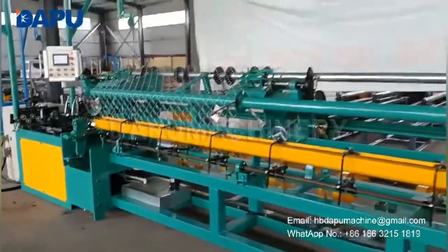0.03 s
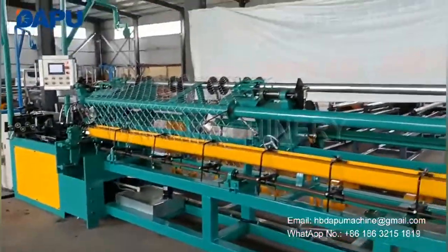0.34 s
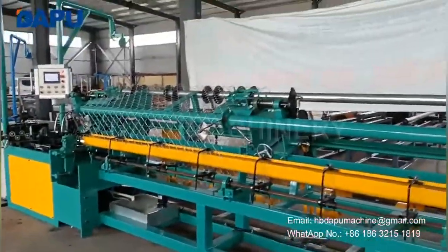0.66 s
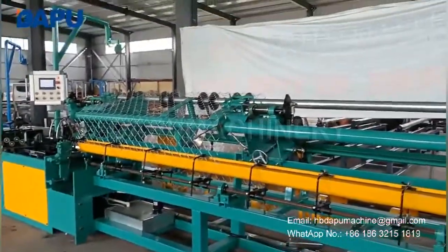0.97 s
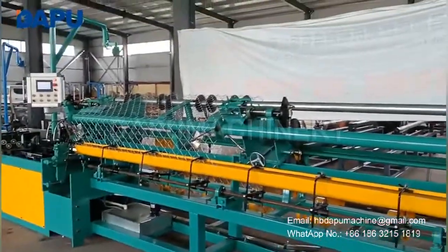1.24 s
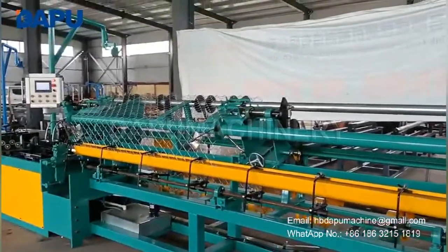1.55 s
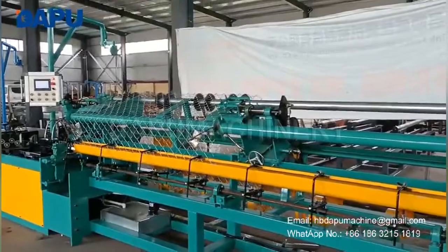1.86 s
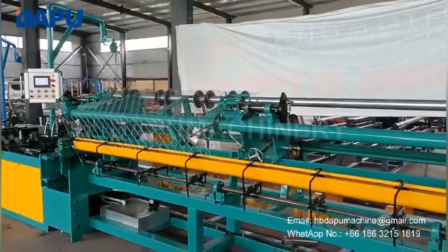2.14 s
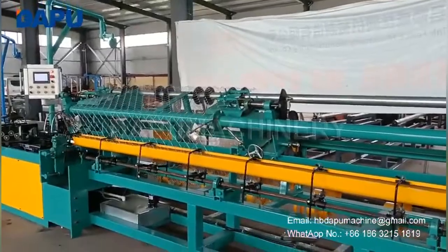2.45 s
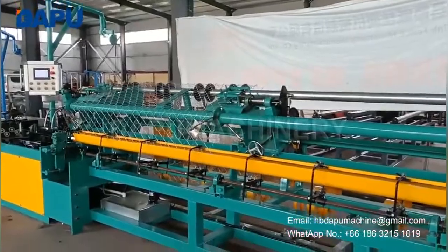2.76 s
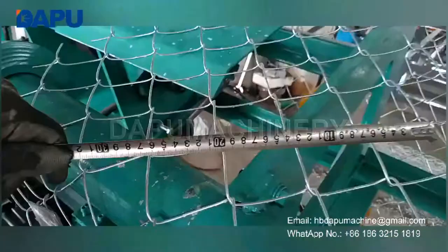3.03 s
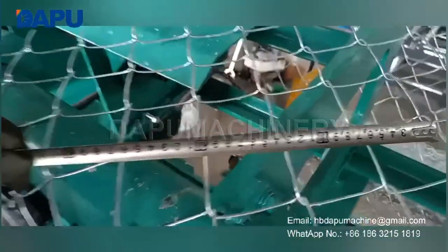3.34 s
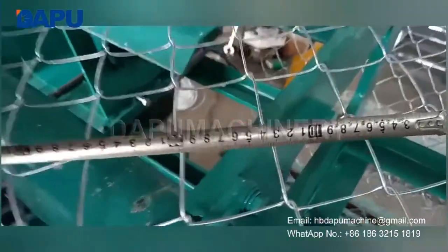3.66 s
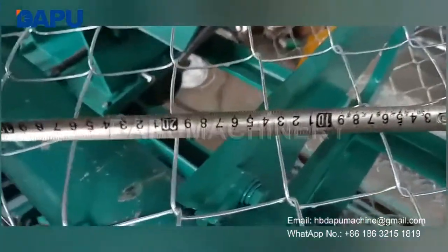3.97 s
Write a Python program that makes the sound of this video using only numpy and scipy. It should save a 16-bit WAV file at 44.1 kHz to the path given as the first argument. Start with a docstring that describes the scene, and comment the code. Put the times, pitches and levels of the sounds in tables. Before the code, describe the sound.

Rapid metallic clatter of a fence weaving machine, a heavy thump, then soft idling hum.

```python
"""Wire rattles, scrapes once a turn and slaps its guide as the spinning blade of a chain-link
weaving machine winds it into the mesh, over a drone in a factory hall. The blade runs down, a clamp
closes, the carriage thumps and hauls the rumbling mesh on, and a lever clacks.
After a short silence the machine idles close by: motor hum and pump whine."""
import sys
import numpy as np
from scipy import signal
from scipy.fft import rfft, irfft, next_fast_len
from scipy.io import wavfile
from scipy.ndimage import uniform_filter1d, map_coordinates

SR = 44100
rng = np.random.default_rng(int(sys.argv[2]) if len(sys.argv) > 2 else 0)


def generate_wav(sig):
    """Save sig (samples, or channels by samples) to the path in sys.argv[1] as 16-bit PCM at SR."""
    pcm = np.round(np.clip(np.atleast_2d(sig).T, -1, 1) * 32767).astype(np.int16)
    wavfile.write(sys.argv[1], SR, pcm)


N = 176400

# blade effort: t/s, rattle level/dB
BLADE_EFFORT = [(0, -23), (.33, -26.5), (.42, -24), (.8, -22), (1.2, -22.5), (1.36, -25), (1.5, -33),
                (1.7, -43.5), (1.9, -51)]
# rattle spectrum: f/Hz, level/dB
RATTLE_SPECTRUM = [(410, -44), (700, -13), (1060, -9), (1300, -12.5), (1710, -4), (1870, -8.5), (2130, -3),
                   (2840, -5.5), (3360, -3), (5290, -7), (7400, 0), (11400, -18.5), (15500, -13)]

def wire_rattle():
    """Spinning wire chatters in dense contacts that fade as the blade runs down."""
    effort_db, = curves(BLADE_EFFORT)
    gain = amp(effort_db + 0.3 * wobble(69.2))
    return gain * spread(taps(per_s=2000, scatter_db=1.5), twang(RATTLE_SPECTRUM))

# scrape of each turn: level/dB
TURN_DB = [-21, -19.5, -18, -18, -17, -16.5, -16.5, -36.5]
# scrape spectrum: f/Hz, level/dB
SCRAPE_SPECTRUM = [(500, -24), (1500, -7), (3400, -2), (5000, -4.5), (7800, -3.5), (10000, -11),
                   (12500, -15.5), (15500, -9)]

def blade_scrape(turn_s=.1935, first_s=.001, fade_s=.027):
    """The blade scrapes the wire once a turn."""
    t = clock() - first_s
    turns = sum(amp(db) * np.exp(-np.abs(t - k * turn_s) / fade_s) for k, db in enumerate(TURN_DB))
    return turns * spread(taps(per_s=6000, scatter_db=1.0), colour(SCRAPE_SPECTRUM))

# wire on guide: t/s, hold/s, level/dB, extra knock/dB
GUIDE_SLAPS = [(0.077, 0.022, -21.5, 5), (0.258, 0.038, -24, 7), (0.368, 0.021, -21, 3),
               (0.438, 0.024, -17.5, 4), (0.568, 0.0099, -22.5, 0.5), (0.627, 0.017, -16.5, 6.5),
               (0.738, 0.0085, -23, -4), (0.772, 0.007, -16, -5.5), (0.823, 0.02, -19, 4),
               (0.97, 0.0062, -30, 2.5), (1.024, 0.0044, -17.5, 7), (1.223, 0.0051, -14, -0.5),
               (1.367, 0.0068, -20.5, -17.5)]
# slap spectrum: f/Hz, level/dB
SLAP_SPECTRUM = [(1000, -23.5), (2300, -4), (3300, 1.5), (4050, -1), (5400, -3.5), (7500, 1), (8500, -1),
                 (10500, -17.5), (15500, -23)]
# guide response: f/Hz, level/dB
KNOCK_SPECTRUM = [(150, -28), (480, -1), (700, -1.5), (1080, -3), (1500, -11), (3000, -18)]

def guide_slaps(knock_db=-15.5, lag_s=.0068):
    """The wire slaps its guide, which answers with a duller knock; returns both."""
    force = sum(amp(db) * envelope(s, .002, hold, .035) for s, hold, db, _ in GUIDE_SLAPS)
    slaps = rms(force) * spread(force * taps(per_s=2000, scatter_db=4.5), twang(SLAP_SPECTRUM))
    recoil = sum(amp(db + knock_db + extra_db) * envelope(s + lag_s, .012, 0, .18)
                 for s, _, db, extra_db in GUIDE_SLAPS)
    return slaps, recoil * noise(colour(KNOCK_SPECTRUM))

# pings of the hardest slaps: t/s, relative level/dB
SLAP_PINGS = [(.388, -23.5), (.452, -21.5), (.645, -21.5), (.78, -25), (.829, -20.5), (1.0235, -12.5),
              (1.2285, -21.5)]
# ping modes: f/Hz, width/Hz, level/dB
PING_MODES = [(3900, 180, 4), (7400, 840, -0.5)]

def wire_pings():
    """The hardest slaps ping sharply; each runs down the wire as a falling chirp."""
    strikes = np.zeros((2, N))
    for s, db in SLAP_PINGS:
        strikes[:, round(s * SR)] = amp(db)
    chirp = lambda hz: body(PING_MODES)(hz) * dispersion(hz)
    peak = np.abs(irfft(chirp(np.fft.rfftfreq(SR, 1 / SR)))).max()
    return 2 * filtered(strikes, chirp) / peak

# blade and wire modes: f/Hz, width/Hz, level/dB
BLADE_MODES = [(1072, 45, -7.5), (1755, 19, -4.5), (2170, 73, -1.5), (3360, 100, 1.5), (4010, 65, 2),
               (5980, 56, -0.5), (6950, 68, -3.5), (7750, 68, 2.5)]

def weaving():
    """Wire contacts ring the blade and wire; clatter and pings carry into the hall."""
    contacts = wire_rattle() + blade_scrape()
    slaps, knock = guide_slaps()
    contacts += slaps
    ring = amp(-15) * ringing(contacts, BLADE_MODES, vary_db=2.5)
    knock_ring = ringing(knock, BLADE_MODES[:2], vary_db=2.5)
    clatter = hall(contacts + ring + knock + knock_ring, wet_db=-5.5)
    return rms(clatter) * patchy(clatter, depth_db=2) + hall(wire_pings(), wet_db=-9)

# mechanism blows: t/s, rise and hold each/s, t60/s, thud/dB, clang/dB, jangle/dB
CARRIAGE_BLOWS = [(1.529, 0.0122, 0.84, -36.5, -26.5, -54), (1.656, 0.018, 1, -41, -37.5, -46),
                  (1.918, 0.028, 0.68, -19.5, -29.5, -23.5), (2.12, 0.016, 1, -40, -40, -29),
                  (2.255, 0.031, 0.32, -46, -46.5, -28.5), (2.35, 0.015, 0.46, -26, -47, -38.5)]
# carriage thud spectrum: f/Hz, level/dB
THUD_SPECTRUM = [(70, -20), (185, 6.5), (270, -13.5), (450, -1), (750, -11.5), (950, -7), (1400, -11.5),
                 (2500, -45), (8000, -56.5)]
# deep bed mode: f/Hz, width/Hz, level/dB
BED_MODE = [(95.5, 79, 0)]
# frame modes: f/Hz, width/Hz, level/dB
FRAME_MODES = [(453, 70, -8.5), (549, 46, -4.5), (652, 23, -2.5), (1300, 49, -11.5)]
# mesh jangle spectrum: f/Hz, level/dB
JANGLE_SPECTRUM = [(500, -17), (1000, -7), (1800, -12), (3000, -6), (5000, -13.5), (7200, -8),
                   (11500, -23.5), (15500, -21.5)]

def clamp_and_carriage():
    """Each blow thuds, clangs the frame and jangles the mesh; only hard ones make the bed boom."""
    thud_gain, clang_gain, jangle_gain = sum(amp(levels)[:, None] * envelope(s, rise, rise, t60)
                                             for s, rise, t60, *levels in CARRIAGE_BLOWS)
    thud = thud_gain * noise(colour(THUD_SPECTRUM))
    boom = amp(17.5) * thud_gain ** 2 * noise(lambda hz: body(BED_MODE)(hz) ** 2)
    clang = clang_gain * noise(body(FRAME_MODES))
    jangle = jangle_gain * spread(taps(per_s=4200, scatter_db=1), twang(JANGLE_SPECTRUM))
    return thud + boom + clang + jangle

# haul: t/s, roller level/dB, rustle level/dB
HAUL_LEVELS = [(1.45, -73, -37), (1.56, -36, -31.5), (1.8, -31.5, -35), (1.91, -29, -30),
               (2.05, -23, -32.5), (2.25, -26.5, -32.5), (2.5, -30, -33), (2.73, -33, -33.5),
               (3, -38.5, -30)]
# mesh rustle spectrum: f/Hz, level/dB
RUSTLE_SPECTRUM = [(500, -19.5), (1400, -5), (3330, -3.5), (4700, -14), (7500, -13), (10300, -27),
                   (15500, -40)]
# hanging mesh modes: f/Hz, width/Hz, level/dB
MESH_MODES = [(1115, 41, -2.5), (1585, 79, 3.5), (2550, 90, 2.5), (2776, 59, -4)]
# roller rumble spectrum: f/Hz, level/dB
ROLLER_SPECTRUM = [(40, -15.5), (120, -6), (170, -0.5), (230, -0.5), (310, 0), (430, -9), (700, -16),
                   (2000, -43.5)]

def mesh_haul(taut_s=2.02):
    """Rollers rumble; the moving mesh rustles, rings and snaps taut."""
    roller_db, rustle_db = curves(HAUL_LEVELS)
    rustle_gain = amp(rustle_db + 0.65 * wobble(40))
    rustle = rustle_gain * spread(taps(per_s=1000, scatter_db=-0.5), twang(RUSTLE_SPECTRUM))
    ring = amp(-9) * ringing(rustle, MESH_MODES, vary_db=6.5)
    snap = amp(-27) * envelope(taut_s, .046, 0, .12) * noise(body(MESH_MODES[2:]))
    rumble = amp(roller_db + 1.7 * wobble(25.05)) * noise(colour(ROLLER_SPECTRUM))
    return rumble + hall(rustle, wet_db=-3.5) + ring + snap

# lever modes: f/Hz, width/Hz, level/dB
LEVER_MODES = [(1460, 100, -0.5), (1680, 94, 0), (2307, 59, 8), (2690, 76, -1.5), (2930, 170, 0),
               (3070, 51, 0), (3870, 250, -6.5), (4900, 410, -12.5), (7500, 1300, -18)]

def lever_clack(start_s=2.931):
    """A steel lever hits its stop, rebounds and chatters."""
    strike = envelope(start_s, .004, .012, .08)
    rebound = amp(-1.5) * envelope(start_s, .019, .01, .49)
    chatter = spread(taps(per_s=3700, scatter_db=6.0), body(LEVER_MODES))
    return amp(-25.5) * (strike + rebound) * chatter

# drive lines: f/Hz, level/dB
DRIVE_LINES = [(160.5, 0), (317.9, -3), (464, 1), (824, -4)]
# running frame spectrum: f/Hz, level/dB
FRAME_SPECTRUM = [(25, -9), (52, -3), (80, -14), (115, -12.5), (160, -3), (460, -2.5), (640, -6),
                  (1500, -9), (2500, -39.5)]

def drive_drone(width_hz=11):
    """The frame drones; the drive adds rough lines while the blade turns."""
    lines = noise(body([(hz, width_hz, db) for hz, db in DRIVE_LINES]))
    drive = amp(-36.5) * lines * envelope(-.01, .01, 1.325, .99)
    frame = amp(-34.5 + 1.1 * wobble(12)) * patchy(noise(colour(FRAME_SPECTRUM)), depth_db=3.0)
    return drive + frame

# motor hum and pump whine: f/Hz, level/dB
HUM_LINES = [(100.2, -53), (165.7, -46), (200.5, -48), (279, -44), (479.4, -55.5), (820.3, -52.5),
             (920.5, -66), (3155, -56)]
# hum swell and pump squeaks: t/s, hold/s, f/Hz, level/dB
IDLE_SWELLS = [(3.43, 0.047, 167, -34), (3.618, 0.011, 2370, -45), (3.665, 0.24, 2740, -52)]
# idle hiss spectrum: f/Hz, level/dB
HISS_SPECTRUM = [(25, -11), (55, -7.5), (110, -14.5), (160, -4.5), (280, -4), (400, -8.5), (560, -19),
                 (850, -23), (1100, -24), (1400, -30.5), (2050, -23.5), (2400, -11), (3000, -16.5),
                 (4200, -20), (5700, -27.5), (7300, -20.5), (10000, -33.5), (14000, -39)]
# mesh touches: t/s, level/dB
MESH_TOUCHES = [(3.305, -43), (3.81, -47), (3.885, -41)]
# touch spectrum: f/Hz, level/dB
TOUCH_SPECTRUM = [(1500, -27), (3800, 7), (5000, 3), (7500, -5), (12000, -28)]

def idling(top_hz=14000):
    """The motor hums and the pump whines and squeaks over hiss; the mesh is touched lightly. Mono."""
    hum = tones(HUM_LINES, waver_db=3.0, drift_rad=0.54)
    swells = sum(envelope(s, .033, hold, .18) * tones([(hz, db)], waver_db=-2.5, drift_rad=0.63)
                 for s, hold, hz, db in IDLE_SWELLS)
    hiss_db, = curves([(3.27, -39), (3.55, -38.5), (4, -36.5)])
    hiss = amp(hiss_db + 0.74 * wobble(20)) * unit(noise(colour(HISS_SPECTRUM))[0])
    touch_gain = sum(amp(db) * envelope(s, .0035, .0046, .059) for s, db in MESH_TOUCHES)
    touches = touch_gain * unit(noise(colour(TOUCH_SPECTRUM))[0])
    return filtered(hum + swells + hiss + touches, lambda hz: hz < top_hz)

# hall decay: f/Hz, t60/s
HALL_T60 = [(200, 0.24), (2000, 1.46), (7000, 1.55), (14000, 0.39)]

def hall(x, wet_db):
    """Add the hall's tail; bass and top treble die first."""
    hz, t, bins = signal.stft(rng.standard_normal((2, SR)), SR, nperseg=256)
    decay = amp(-60 * t / along(HALL_T60, hz)[:, None])
    tail = signal.istft(bins * decay, SR, nperseg=256)[1]
    return x + amp(wet_db) * signal.fftconvolve(x, tail / np.linalg.norm(tail[0]), axes=1)[:, :N]

# stereo width: f/Hz, side over mid/dB
STEREO_WIDTH = [(30, -23.5), (130, -26.5), (260, -19.5), (500, -12.5), (1000, -2), (2000, 0.5)]

def spread(pair, response):
    """Filter two unrelated signals into stereo, narrow in the bass, rms 1."""
    def mid_side(hz):
        angle = np.arctan(amp(along(STEREO_WIDTH, hz)))
        return response(hz) * np.array([np.cos(angle), np.sin(angle)])
    mid, side = filtered(pair, mid_side)
    return unit(np.array([mid + side, mid - side]))

def dispersion(hz, travel_s=.009, ref_hz=8497):
    """Bending waves on a wire: each frequency lags by travel_s*(sqrt(ref_hz/hz) - 1), nothing at ref_hz; treble
    arrives first."""
    return np.exp(-2j * np.pi * travel_s * (2 * np.sqrt(hz * ref_hz) - hz))

def twang(spectrum):
    """Response of a dispersive wire."""
    return lambda hz: amp(along(spectrum, hz)) * dispersion(hz)

def colour(spectrum):
    """Response of a smooth spectrum."""
    return lambda hz: amp(along(spectrum, hz))

def body(modes):
    """Response of resonances of alternating sign."""
    return lambda hz: sum((-1) ** k * amp(db) * 1j * hz * width / (f0 ** 2 - hz ** 2 + 1j * hz * width)
                          for k, (f0, width, db) in enumerate(modes))

def ringing(x, modes, vary_db):
    """Modes rung by x, at its rms; each mode's ring swells and fades at random."""
    return rms(x) * unit(sum(amp(vary_db * wobble(16)) * filtered(x, body([mode])) for mode in modes))

def taps(per_s, scatter_db):
    """Two channels of random, uneven contacts, rms 1."""
    strength = amp(scatter_db * np.clip(rng.standard_normal((2, N)), -2, 2))
    polarity = np.sign(rng.standard_normal((2, N)))
    return unit(strength * polarity * (rng.random((2, N)) < per_s / SR))

def noise(response):
    """Coloured stereo noise, rms 1."""
    return spread(rng.standard_normal((2, N)), response)

def tones(lines, waver_db, drift_rad):
    """Sines, unsteady in level and phase."""
    return sum(np.sqrt(2) * amp(db + waver_db * wobble(9.9))
               * np.sin(2 * np.pi * hz * clock() + drift_rad * wobble(7.1)) for hz, db in lines)

def patchy(x, depth_db):
    """Random gain patches over time and frequency; output rms 1."""
    bins = signal.stft(x, nperseg=512)[2]
    field = uniform_filter1d(rng.standard_normal(bins.shape[1:]), size=4, axis=0)
    field = uniform_filter1d(field, size=6, axis=1)
    return unit(signal.istft(bins * amp(depth_db * unit(field)), nperseg=512)[1][:, :N])

def envelope(start_s, rise_s, hold_s, t60_s):
    """Rise, hold, die away."""
    t = clock() - start_s
    return np.clip(t / rise_s, 0, 1) * amp(-60 * np.maximum(t - rise_s - hold_s, 0) / t60_s)

def wobble(knots_per_s):
    """Smooth random curve."""
    return map_coordinates(rng.standard_normal(1024), [clock() * knots_per_s], mode="mirror")

def filtered(x, response):
    """Apply a complex frequency response."""
    size = next_fast_len(N + SR // 2)
    return irfft(rfft(x, size) * response(np.fft.rfftfreq(size, 1 / SR)), size)[..., :N]

def curves(rows):
    """Per-sample curve of each column after t/s."""
    times, *columns = np.transpose(rows)
    return [np.interp(clock(), times, column) for column in columns]

def along(points, hz):
    """Interpolate over log frequency."""
    knots_hz, values = np.transpose(points)
    return np.interp(np.log(hz + 1), np.log(knots_hz + 1), values)

def clock():
    return np.arange(N) / SR

def amp(db):
    return 10 ** (np.asarray(db) / 20)

def rms(x):
    return np.sqrt(np.mean(x ** 2) + 1e-20)

def unit(x):
    return x / rms(x)

# balance: f/Hz, left over right/dB
BALANCE = [(300, 0), (1000, -0.5), (2200, 3), (7000, 2), (13000, 2.5)]

def scene(work_hold_s=2.994, idle_start_s=3.266):
    """The working machine, slightly left; silence; the idling machine."""
    work = weaving() + drive_drone() + clamp_and_carriage() + mesh_haul() + lever_clack()
    work = filtered(work, lambda hz: amp(along(BALANCE, hz) * np.array([[.5], [-.5]])))
    work *= envelope(-.0087, .0073, work_hold_s, .032)
    return work + idling() * envelope(idle_start_s, .00118, 1, 1)

def record(dry):
    """Steep low-pass."""
    top_hz, edge_hz = 15800, 200
    return filtered(dry, lambda hz: np.clip((top_hz - hz) / edge_hz + .5, 0, 1))

dry = scene()
out = record(dry)
generate_wav(out)
```